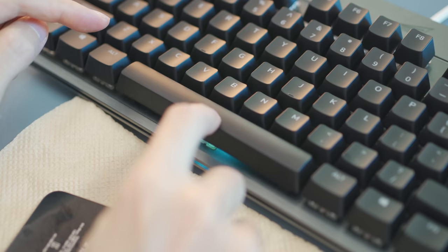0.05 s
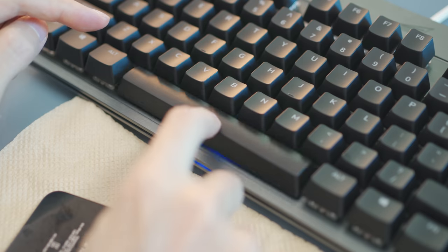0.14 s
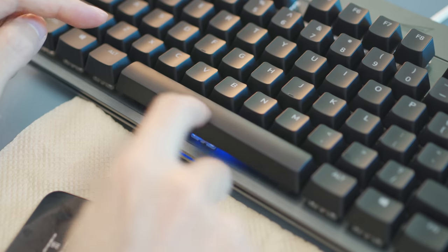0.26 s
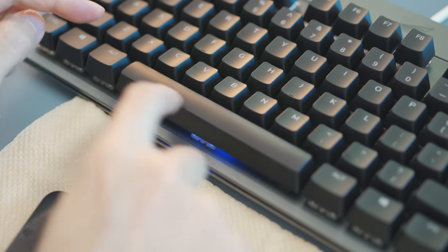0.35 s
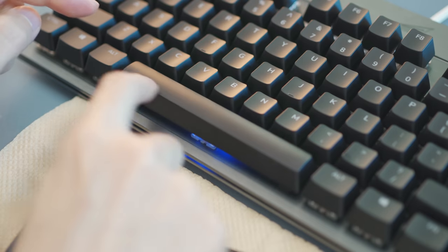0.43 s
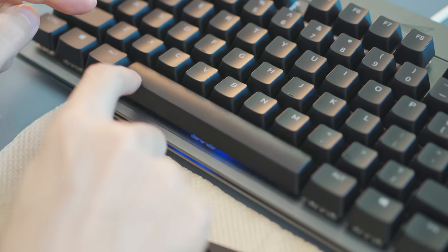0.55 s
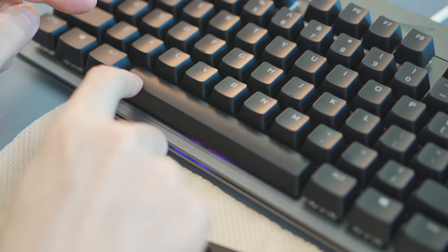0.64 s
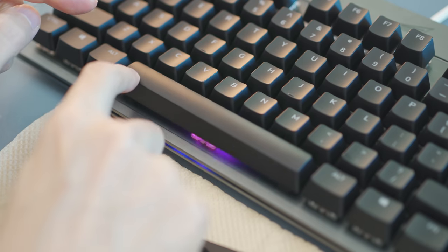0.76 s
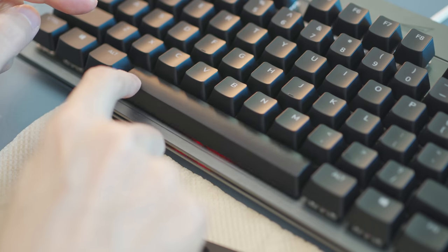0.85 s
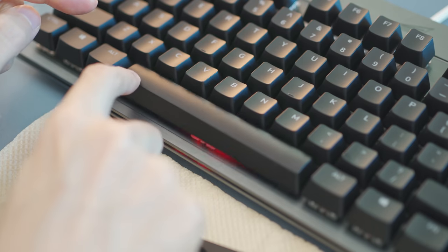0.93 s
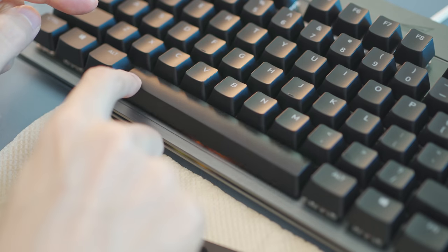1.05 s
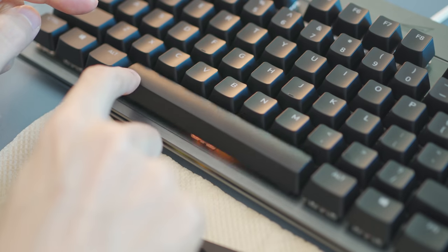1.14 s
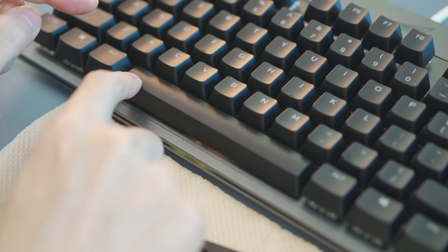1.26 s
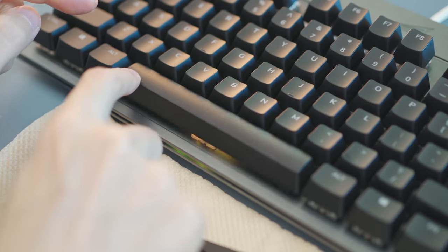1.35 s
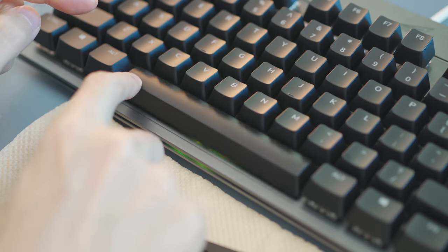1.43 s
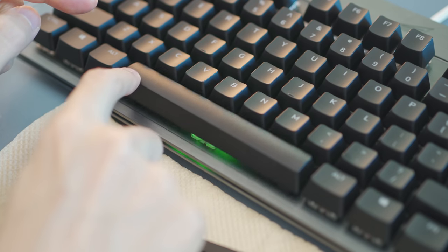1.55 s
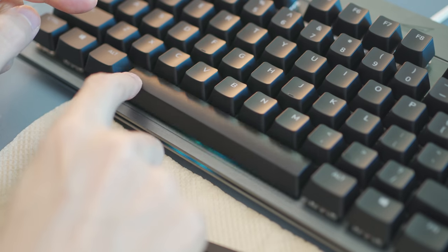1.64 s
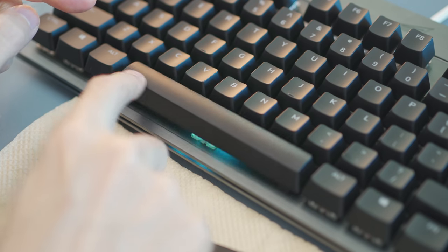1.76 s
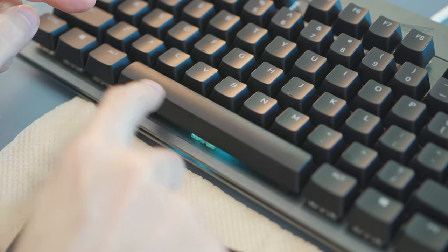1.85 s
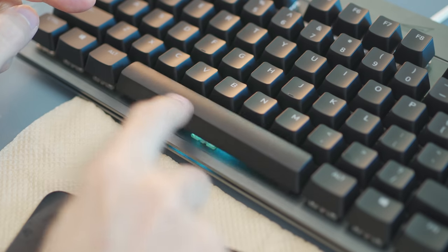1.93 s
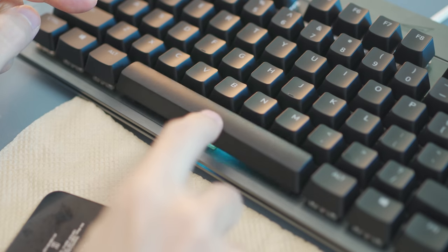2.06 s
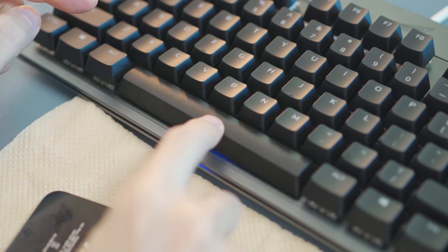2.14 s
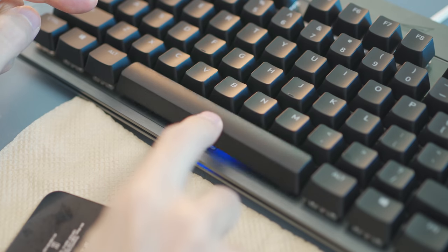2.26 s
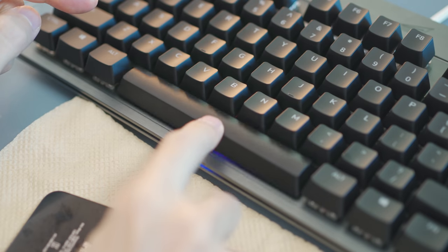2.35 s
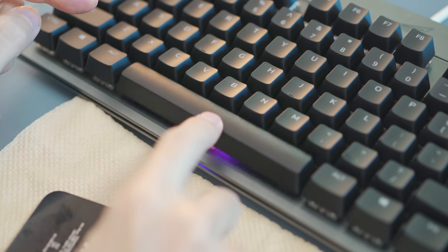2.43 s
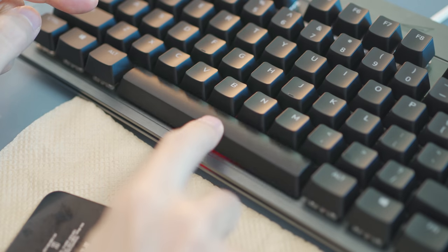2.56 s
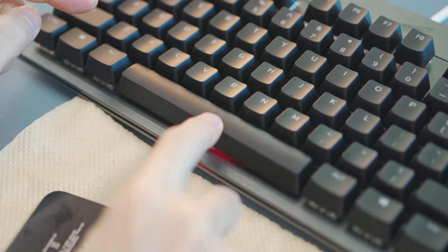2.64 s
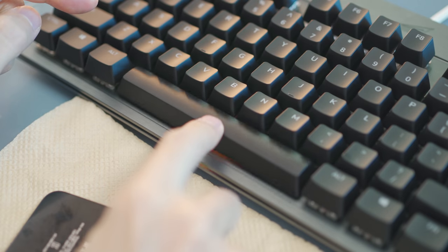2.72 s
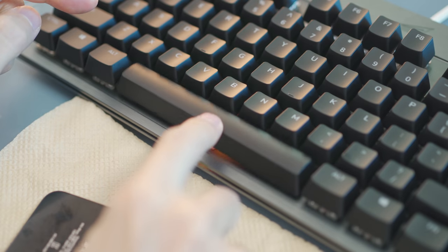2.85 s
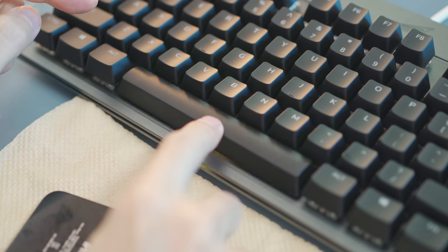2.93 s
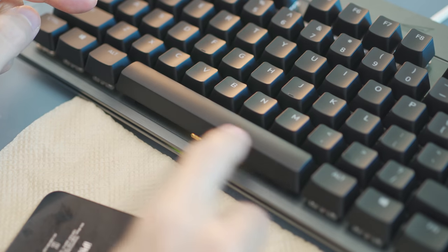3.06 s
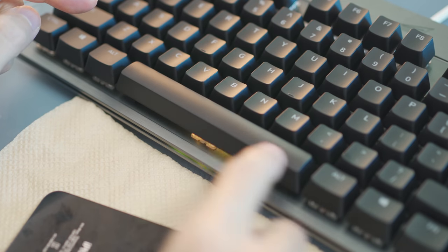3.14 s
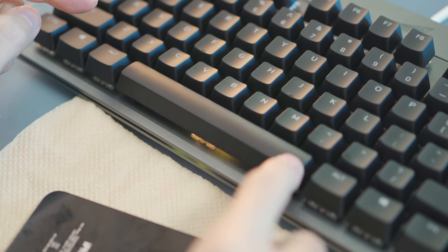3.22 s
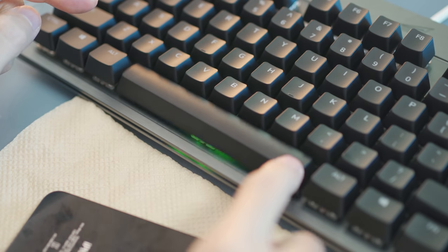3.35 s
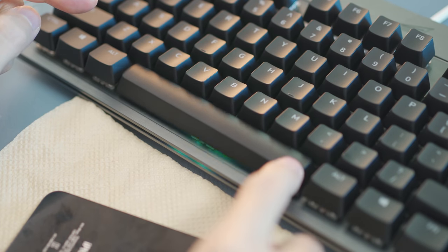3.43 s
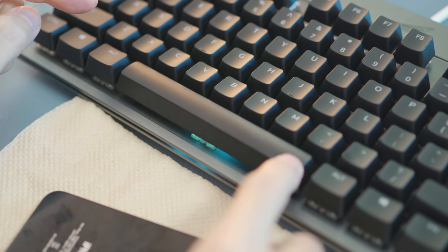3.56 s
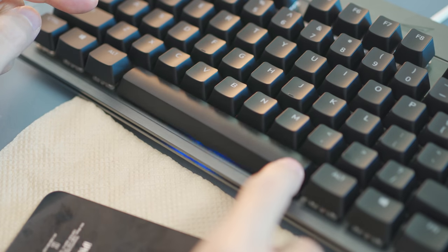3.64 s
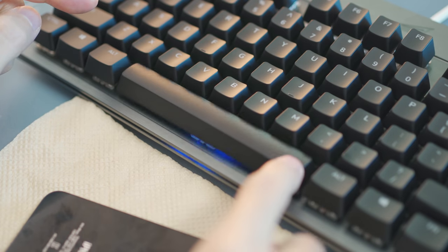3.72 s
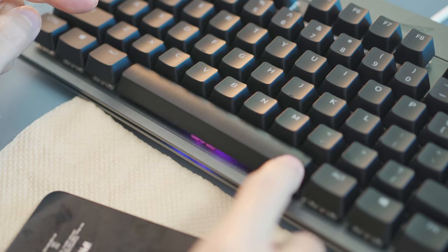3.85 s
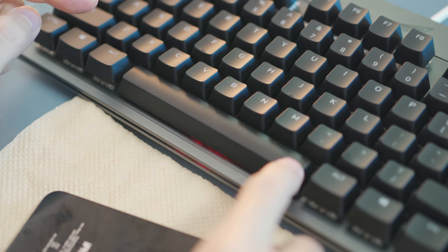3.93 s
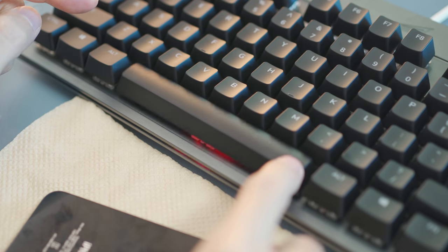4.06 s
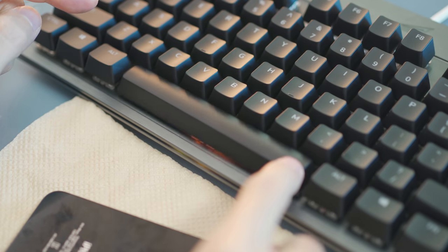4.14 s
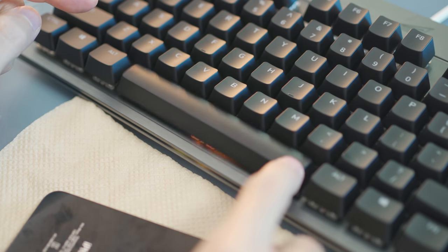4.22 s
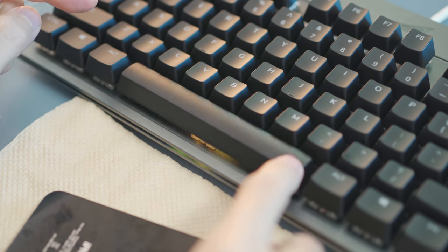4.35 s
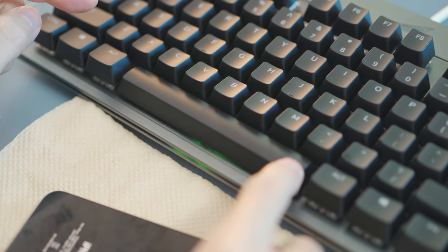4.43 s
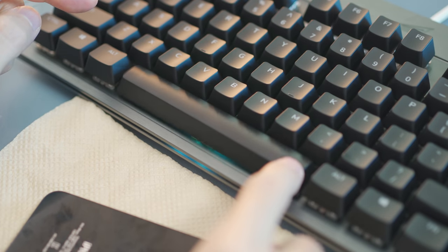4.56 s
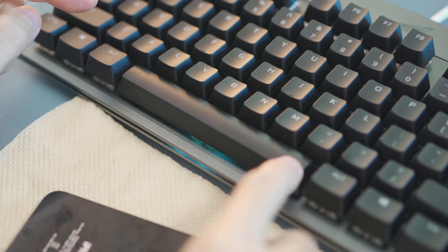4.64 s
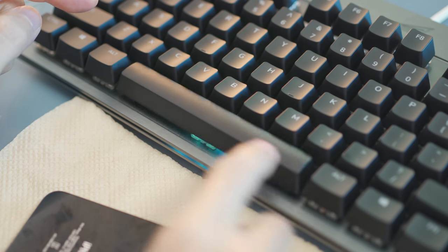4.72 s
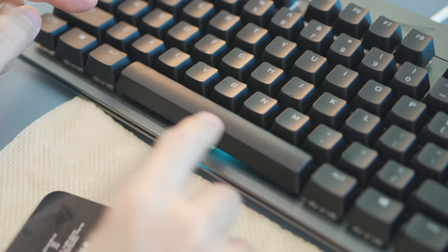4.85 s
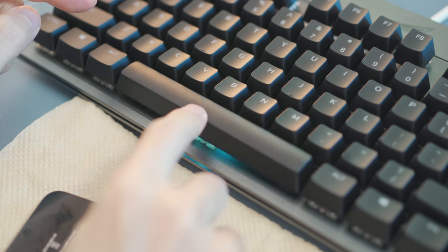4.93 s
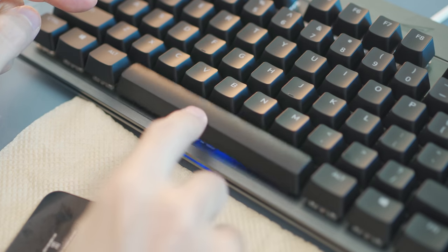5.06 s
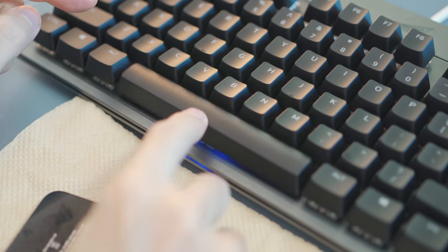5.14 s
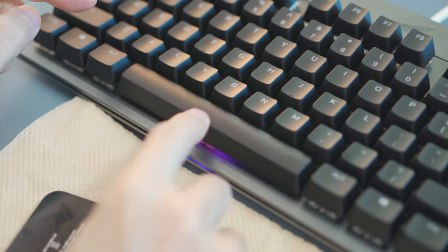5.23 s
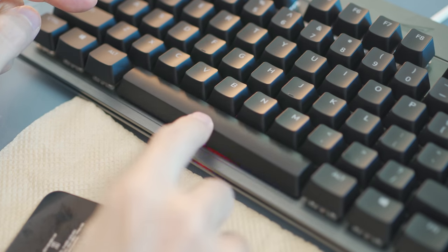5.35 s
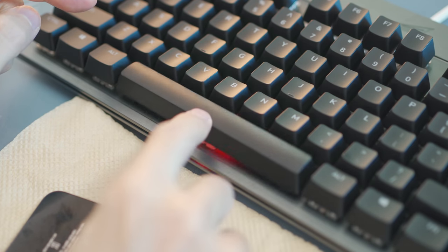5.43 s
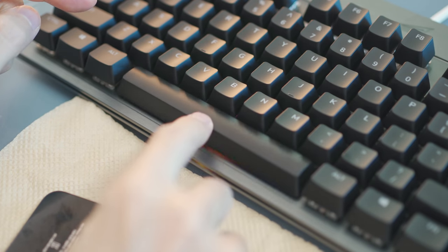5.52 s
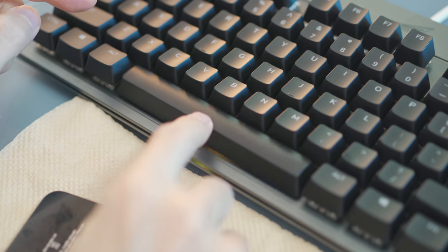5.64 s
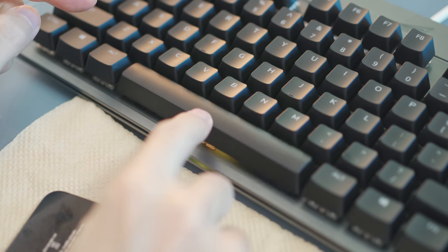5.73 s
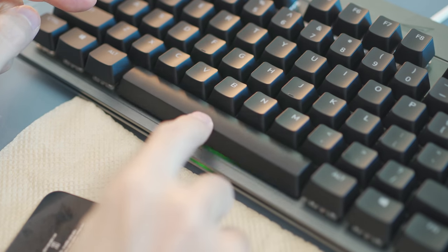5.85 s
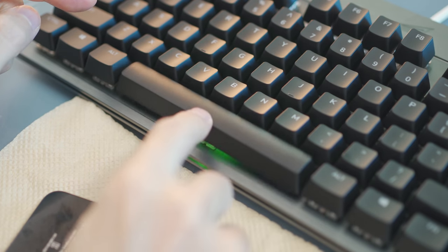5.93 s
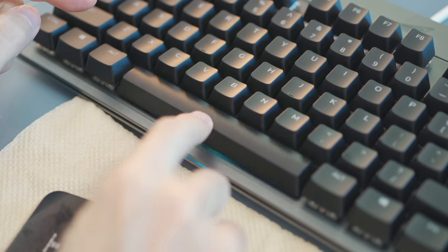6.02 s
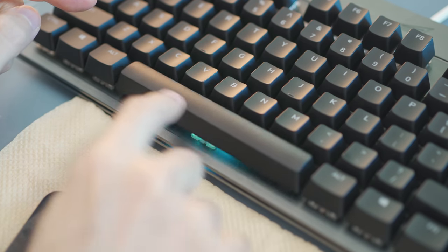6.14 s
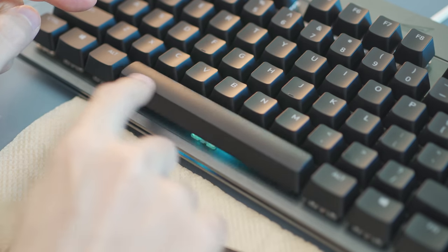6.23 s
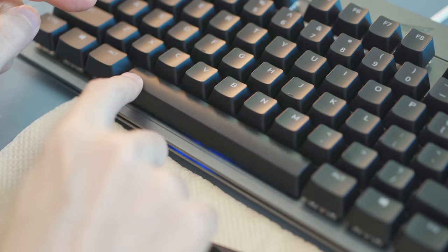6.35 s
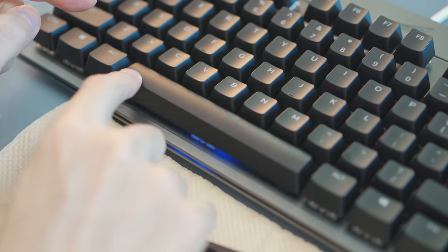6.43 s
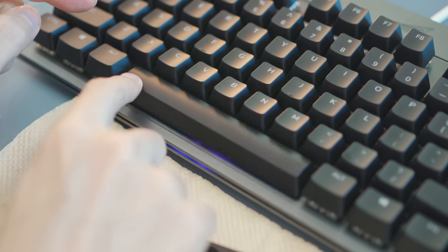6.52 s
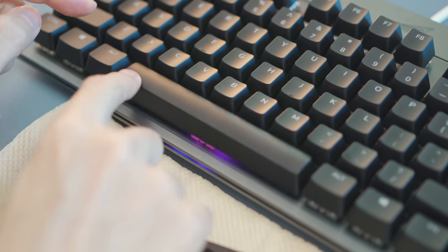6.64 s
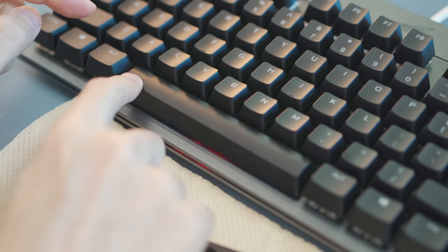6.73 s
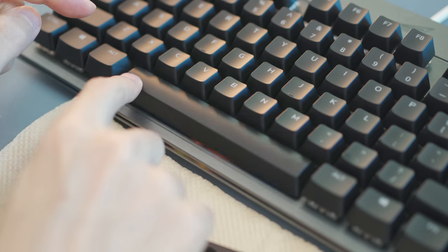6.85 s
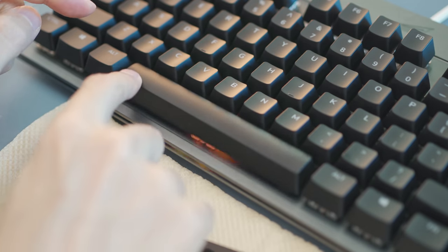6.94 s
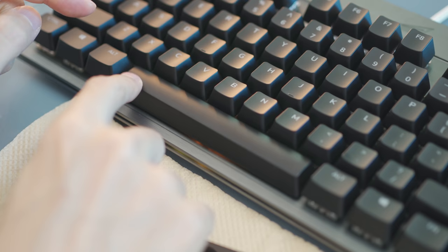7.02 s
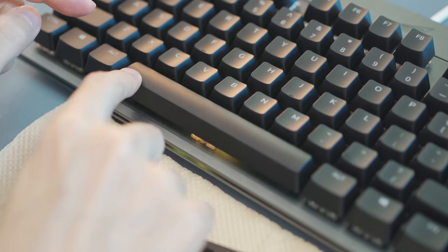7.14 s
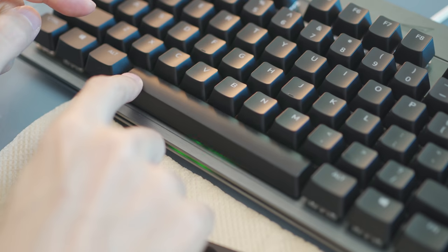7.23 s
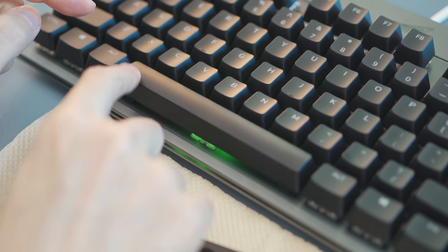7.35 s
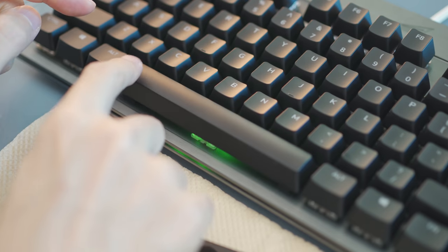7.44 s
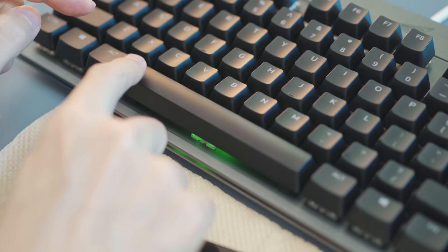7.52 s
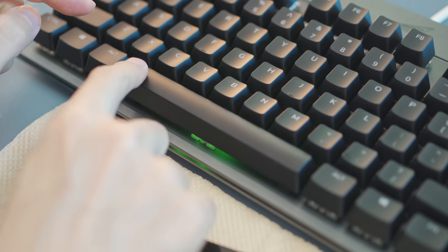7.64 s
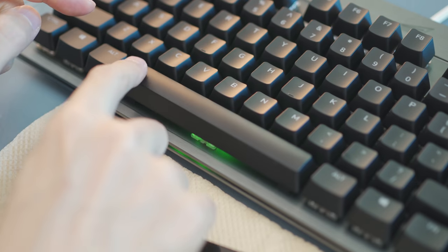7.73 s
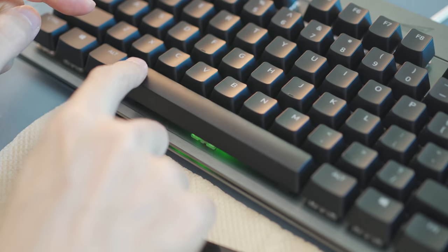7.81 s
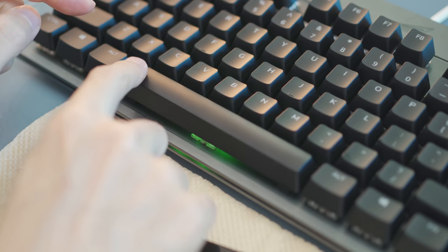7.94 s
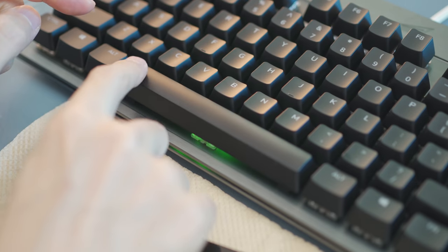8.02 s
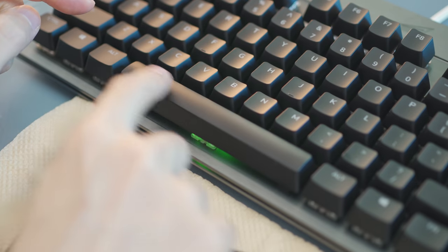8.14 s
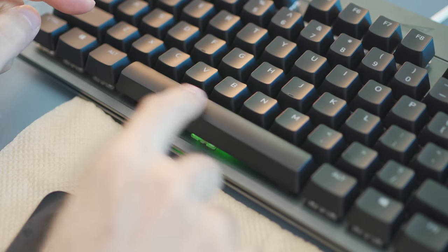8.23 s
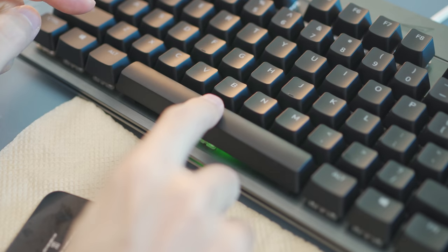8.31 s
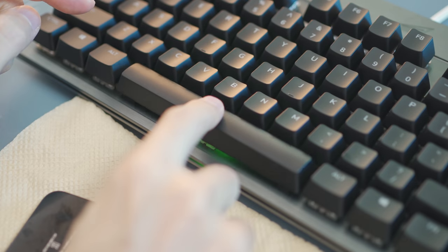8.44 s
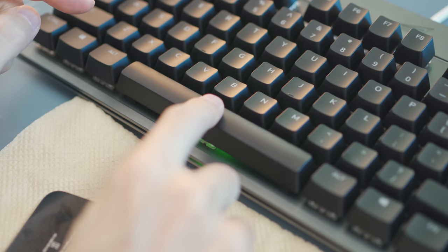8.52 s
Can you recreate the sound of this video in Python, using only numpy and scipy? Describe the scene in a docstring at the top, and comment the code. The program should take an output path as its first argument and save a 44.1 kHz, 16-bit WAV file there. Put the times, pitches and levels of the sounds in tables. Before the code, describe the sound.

Close to the microphone, a finger taps a mechanical keyboard's long spacebar about four to six times a second. Hard, bright plastic clacks come in runs, broken by short pauses with tiny fingertip ticks and faint rubbing. Blows at the left end are louder and ringing; those at the middle and right are softer, with more rattle and desk thud. The small room adds a brief echo over quiet hum and hiss.

```python
"""Quick plastic clacks with small ticks and whispers, close to the microphone in a small room over a low hum.
A finger taps a long spacebar at its left end, middle and right end. Each bottoming-out rings the bar, plate
and case as fading waves, rattles loose parts as bright noise, shakes the desk and fades in the room.
The fingertip ticks when it lands or lifts and whispers as it slides: both are shaped noise.
Motor tones, wavering hum, hiss and three thin gliding whistles lie underneath."""
import sys
import numpy as np
from scipy import signal
from scipy.fft import rfft, irfft
from scipy.io import wavfile

SR = 44100
rng = np.random.default_rng(int(sys.argv[2]) if len(sys.argv) > 2 else 0)


def file_out(sig):
    """Save sig as 16-bit WAV at sys.argv[1]."""
    # one column per channel
    cols = np.atleast_2d(sig).T
    # limit, then scale
    lim = np.clip(cols, -1, 1)
    pcm = np.round(lim * 32767).astype(np.int16)
    wavfile.write(sys.argv[1], SR, pcm)


N = 378378
LEAD = SR // 10  # samples of room before the start, so that earlier sounds can ring in


def undb(db):
    """Turn decibels into a plain amplitude factor."""
    return 10 ** (np.asarray(db) / 20)


def fade(t, t60):
    """Die away exponentially, losing 60 dB in t60 seconds."""
    return np.exp(-np.log(1000) * t / t60)


def swell(t, start, length):
    """A smooth rise and fall, silent outside."""
    return np.sin(np.pi * np.clip((t - start) / length, 0, 1)) ** 2


def band(x, hz, width):
    """Two-pole resonance, gain 1 at the centre."""
    return signal.lfilter(*signal.iirpeak(min(hz, .45 * SR), hz / width, fs=SR), x)


def band_twice(x, hz, width):
    """The same resonance passed twice, for steeper sides."""
    return band(band(x, hz, width), hz, width)


def unit(x):
    """Scale to an average (RMS) level of 1."""
    return x / np.sqrt(np.mean(x ** 2))


def add(out, x, s):
    """Mix a sound in, starting s seconds into the scene."""
    i = int(round(s * SR)) + LEAD
    out[i:i + len(x)] += x


def background():
    """Smooth hiss, wavering hum from narrow bands of noise, and steady motor tones."""
    # room and microphone hiss, the shape of its spectrum: (frequency [Hz], relative level [dB per Hz])
    air_shape = [(88, -19.5), (150, -4.5), (244, -9.5), (333, -11.5), (390, -7), (438, -12), (598, -13),
                 (647, -14), (919, -17), (2630, -27), (5310, -31), (15800, -35.5)]
    # wavering hum: (frequency [Hz], width of each filter pass [Hz], level [dB])
    hum_bands = [(27.22, 15, -69.5), (45, 45, -63.5), (77, 39, -67), (135, 30, -68.5), (247.4, 14, -75.5),
                 (389, 23, -80.5), (5300, 40, -91.5)]
    # shaft turn, mains buzz, third order of the shaft (the last two beat): (frequency [Hz] of each)
    motor_hz = (41.2, 120, 123.6)
    # the same three tones: (level [dB] of each)
    motor_db = (-60, -65, -63)
    air_db = -63.5
    hz, db = np.transpose(air_shape)
    bins = np.arange(N // 2 + 1) * SR / N + 1  # 1 Hz up, so that the logarithm exists
    colour = undb(np.interp(np.log(bins), np.log(hz), db))
    hiss = irfft(rfft(rng.standard_normal(N)) * colour, N)
    out = undb(air_db) * unit(hiss)
    for hum_hz, width, hum_db in hum_bands:
        hum = band_twice(rng.standard_normal(N), hum_hz, width)
        out = out + undb(hum_db) * unit(hum)
    for tone_hz, tone_db in zip(motor_hz, motor_db):
        turns = tone_hz * np.arange(N) / SR + rng.random()
        out = out + undb(tone_db) * np.sqrt(2) * np.sin(2 * np.pi * turns)
    return out


def room(x):
    """A diffuse tail that sets in almost at once, with three distinct reflections within it."""
    # ranges of the tail: (frequency [Hz], relative level [dB], time to fade by 60 dB [s])
    tail_ranges = [(282, 1, 0.61), (660, 11, 0.24), (1390, 1.5, 0.34), (2780, -16.5, 0.093),
                   (6250, -2, 0.06), (10700, 6.5, 0.22)]
    # distinct reflections: (delay [s], level [dB])
    wall_echoes = [(0.011, -18.5), (0.0071, -25), (0.019, -16)]
    tail_db, tail_start_s = -8, 0.0024
    t = np.arange(SR // 2) / SR
    tail = 0
    for hz, db, t60 in tail_ranges:  # each range dies at its own rate
        noise = rng.standard_normal(len(t))
        tail = tail + undb(db) * band(noise, hz, hz) * fade(t, t60)
    tail = tail * (1 - np.exp(-(t / tail_start_s) ** 4))
    echo = undb(tail_db) * tail / np.sqrt(np.sum(tail ** 2))
    for s, db in wall_echoes:
        echo[int(s * SR)] += undb(db)
    return signal.fftconvolve(x, echo)[:len(x)]


def whistle():
    """Three faint gliding tones: sine waves whose pitch moves in a straight line."""
    # (start [s], length [s], starting frequency [Hz], ending frequency [Hz], level [dB])
    glides = [(.545, 0.049, 9400, 9950, -77), (.58, 0.072, 9300, 9200, -71.5),
              (.675, 0.042, 10000, 9150, -75)]
    out, t = 0, np.arange(N) / SR
    for s, length, from_hz, to_hz, db in glides:
        hz = np.interp(t, [s, s + length], [from_hz, to_hz])
        tone = np.sin(2 * np.pi * np.cumsum(hz) / SR)
        out = out + np.sqrt(2) * undb(db) * swell(t, s, length) * tone
    return out


def slides():
    """Friction noise in the cap's resonances while the finger speeds up and slows down along the bar."""
    # skin sliding over the textured cap: (start [s], length [s], level [dB], brightness [dB per octave])
    strokes = [(0.28, 0.22, -70.5, 0), (1.745, 0.085, -72.5, -2), (1.845, 0.24, -73, 2),
               (3.04, 0.15, -75, 4), (4.713, 0.27, -73, 4), (6.098, 0.14, -75, -2), (8.212, 0.13, -70, 0)]
    # resonances of the rubbed cap: (frequency [Hz], width [Hz], level [dB])
    skin_bands = [(3254, 770, -5.5), (4200, 260, -3), (7080, 1000, -9), (8310, 1100, -4), (13000, 2200, -3)]
    t, noise, out = np.arange(N) / SR, rng.standard_normal(N), 0
    for hz, width, skin_db in skin_bands:
        octaves = np.log2(hz / skin_bands[2][0])  # brightness pivots on the third resonance
        speed = 0
        for s, length, db, tilt_db in strokes:
            speed = speed + undb(db + tilt_db * octaves) * swell(t, s, length)
        out = out + speed * undb(skin_db) * unit(band(noise, hz, width))
    return out


def ticks():
    """A brief rough push that sounds a knock of the hollow cap, a click and a crisp edge."""
    # fingertip and stem ticks: (time [s], knock peak [dB], click peak [dB], edge peak [dB])
    tick_table = [(0.066, -65, -55, -63), (0.265, -49, -38, -46), (0.312, -46.5, -68, -64.5),
                  (0.748, -49, -49, -48), (0.823, -52, -48.5, -50), (0.843, -49, -51, -66),
                  (1.248, -51, -54, -66), (2.129, -58, -60, -62), (3.022, -50.5, -42.5, -44.5),
                  (3.283, -48.5, -42.5, -51), (3.622, -62, -53, -57), (4.263, -50, -51, -66),
                  (4.706, -58, -41, -41), (4.99, -52.5, -43, -48), (5.133, -34.5, -53, -60),
                  (5.173, -54, -44, -47), (5.336, -55, -48, -62), (5.656, -50, -49, -49),
                  (5.68, -59, -50, -58), (5.828, -56, -50, -66), (5.999, -60, -48, -76),
                  (6.097, -48, -40, -43.5), (6.33, -63.5, -38.5, -65), (6.366, -53, -52, -58),
                  (7.235, -51, -43, -71), (7.393, -46, -50, -55.5), (7.617, -52.5, -47.5, -59),
                  (7.81, -69, -55, -60)]
    # knock, click, edge: (frequency [Hz], width of each filter pass [Hz], time for the push to fade by 60 dB [s])
    tick_bands = [(780, 900, 0.007), (3300, 2600, 0.0094), (9350, 14000, 0.0072)]
    out, t = np.zeros(N + 2 * LEAD), np.arange(SR // 40) / SR
    for s, *levels_db in tick_table:
        for db, (hz, width, t60) in zip(levels_db, tick_bands):
            push = rng.standard_normal(len(t)) * fade(t, t60)
            grain = band_twice(push, hz, width)
            add(out, undb(db) * grain / np.abs(grain).max(), s)
    return out


def scrape(seconds):
    """Plastic on plastic: a short swell of noise in the bar's resonances."""
    noise = rng.standard_normal(int(seconds * SR))
    rub = band_twice(noise, 3200, 2500) + .6 * band(noise, 1500, 600)
    return unit(rub) * np.sqrt(np.hanning(len(noise)))


def desk_thud(t):
    """The desk answers late: low waves that swell in briefly, then fade."""
    # (frequency [Hz], signed swing, time to fade by 60 dB [s])
    desk_modes = [(78.5, 0.64, 0.14), (363.3, 1.1, 0.083), (471.4, -2.18, 0.046), (670, -0.74, 0.023),
                  (1165, 0.27, 0.2), (1425, .4, .22)]
    rise_s = 0.0024
    waves = sum(swing * fade(t, t60) * np.sin(2 * np.pi * hz * t) for hz, swing, t60 in desk_modes)
    return waves * (1 - np.exp(-(t / rise_s) ** 2))


def rattle(place, t):
    """A bright grain as the loose parts slap, and a weaker repeat 3 ms later, reflected from the desk."""
    # loose stabiliser wire: (frequency [Hz], width of each filter pass [Hz],
    # level at place 0 [dB], level at place 1 [dB])
    wire_bands = [(3143, 1460, -23, -3), (4266, 510, -8, -4.5), (5410, 1240, -8.5, -7),
                  (7830, 1770, -3, -7), (12200, 2500, -15.5, -13.5)]
    t60, desk_echo_s, desk_echo_db = .006, .0031, -14.5
    noise = rng.standard_normal(len(t))
    desk_echo = undb(desk_echo_db) * (t > desk_echo_s) * fade(np.abs(t - desk_echo_s), t60)
    loudness = fade(t, t60) + desk_echo
    out = 0
    for hz, width, end_db, middle_db in wire_bands:
        grain = band_twice(noise * loudness, hz, width)
        level_db = end_db + place * (middle_db - end_db)
        out = out + undb(level_db) * grain / np.abs(grain).max()
    return out


def ring(place, t):
    """One blow: a brief smooth contact force rings the modes as they are excited at that place on the bar."""
    # modes of bar, plate and case: (frequency [Hz], time to fade by 60 dB [s],
    # typical signed swing for a blow at place 0, the same at place 1)
    bar_modes = [(849, .007, .19, .31), (935, .027, -.05, -.05), (1162, .022, -.03, -.15),
                 (1388, .024, .08, .23), (1438, .029, .22, .02), (1486, .035, .0, -.23),
                 (1536, .027, -.2, -.4), (1593, .02, -.37, -.11), (1872, .02, -.22, -.22),
                 (1987, .036, .05, .04), (2428, .005, -.45, -.03), (2915, .012, .21, -.01),
                 (3235, .007, .51, .35), (4028, .004, .26, .42), (4180, .022, -.04, -.04),
                 (4325, .005, -.18, -.07), (5179, .011, .02, .03)]
    contact_s, scatter = .00011, .1  # each swing varies at random, typically by a tenth
    hz, t60, at_end, at_middle = np.transpose(bar_modes)[:, :, None]
    swing = at_end + place * (at_middle - at_end)
    swing = swing * (1 + scatter * rng.standard_normal(hz.shape))
    waves = swing * fade(t, t60) * np.cos(2 * np.pi * hz * t)
    push = swell(t[:20], 0, contact_s)
    return np.convolve(waves.sum(axis=0), push / push.sum())[:len(t)]


def presses():
    """The bar scrapes down, hits the plate, shakes the desk and springs back; for microphone and walls."""
    # bottoming-out blows: (time [s], level [dB], place from 0 left end to 1 middle and right,
    # rattle level relative to the blow [dB])
    blow_table = [(0.171, -10.5, 0.68, -15.5), (0.6384, -5, 0.0, -15.5), (0.8777, -8.5, 0, -19.5),
                  (1.0877, -13, 0.041, -18.5), (1.2746, -10.5, 0.1, -21.5), (1.47, -10, 0.0019, -21.5),
                  (1.674, -9.5, 0, -20), (2.1722, -9.5, 0.9, -10.5), (2.386, -12.5, 1.0, -16),
                  (2.57, -14, 1.0, -15.5), (2.7486, -14.5, 0.91, -13.5), (2.9252, -14.5, 1.0, -16.5),
                  (3.3171, -9.5, 0.76, -16), (3.4956, -12, 0.86, -18.5), (3.6672, -11.5, 0.72, -15),
                  (3.8214, -14.5, 0.98, -19.5), (3.9847, -16, 1.0, -20), (4.1334, -15, 1.0, -17),
                  (4.294, -16, 1.0, -19), (4.4512, -16, 0.98, -19), (4.6155, -16, 1, -20),
                  (5.0246, -7, 0.54, -13.5), (5.2271, -15.5, 0.54, -25.5), (5.3611, -11.5, 0.94, -11.5),
                  (5.542, -16, 1.0, -13.5), (5.6989, -14.5, 1.0, -13.5), (5.8608, -14, 0.66, -17),
                  (6.025, -16.5, 1.0, -20), (6.3873, -7, 0, -19.5), (6.5685, -8.5, 0.0015, -17),
                  (6.731, -8, 0.01, -18.5), (6.9001, -10, 0.024, -19), (7.0746, -9.5, 0.036, -17.5),
                  (7.2662, -10, 0.02, -17.5)]
    # the blow whose echo still hangs at the start: same columns
    earlier_blow = (-.02, -12, 1, -20)
    travel_s, travel_db = 0.032, -65.5  # the stem scrapes its guide on the way down
    return_s, return_db, return_scrape_s = 0.059, -62.5, 0.021  # and again as the bar springs back
    pause_s, full_stroke_db = .3, 5  # after a pause the bar starts from the very top and scrapes louder
    desk_end_db, desk_middle_db = -33.5, -26  # relative to the blow: the desk shakes more under the middle
    desk_far_db = -4.5  # the desk's thud reaches the walls more weakly
    far_t60 = 0.0071  # [s] the ringing stays near the board; mostly the first crack reaches the walls
    click_delay_s, click_db = .0031, 11  # a broad bright click, sent only to the room for its treble tail

    near, far, t = np.zeros(N + 2 * LEAD), np.zeros(N + 2 * LEAD), np.arange(LEAD) / SR
    desk = desk_thud(t)
    impulse = 1. * (np.arange(LEAD) == int(click_delay_s * SR))  # slightly delayed
    room_click = undb(click_db) * band_twice(impulse, 6400, 4400)
    blows = np.array([earlier_blow, *blow_table])
    rested = np.diff(blows[:, 0], prepend=blows[0, 0]) > pause_s
    for (s, db, place, rattle_db), full in zip(blows, rested):
        desk_db = desk_end_db + place * (desk_middle_db - desk_end_db)
        clack = ring(place, t)
        loose = undb(rattle_db) * rattle(place, t)
        thud = undb(desk_db) * desk
        add(near, undb(db) * (clack + loose + thud), s)
        to_walls = clack * fade(t, far_t60) + undb(rattle_db) * room_click + undb(desk_far_db) * thud
        add(far, undb(db) * to_walls, s)
        add(near, undb(travel_db + full * full_stroke_db) * scrape(travel_s), s - travel_s)
        add(near, undb(return_db) * scrape(return_scrape_s), s + return_s)
    return near, far


def scene():
    """Blows and ticks with their room echo, plus slides, whistles and background."""
    touch_far_db = -8  # fingertip ticks stay close to the microphone
    near, far = presses()
    touch = ticks()
    echo = room(far + undb(touch_far_db) * touch)
    keys = (near + touch + echo)[LEAD:LEAD + N]
    return (keys + slides() + whistle() + background())[None]


def record(dry):
    """The recorder cuts the top steeply, above 16.5 kHz."""
    return signal.sosfilt(signal.ellip(10, .2, 70, 16500, fs=SR, output="sos"), dry)


dry = scene()
out = record(dry)
file_out(out)
```